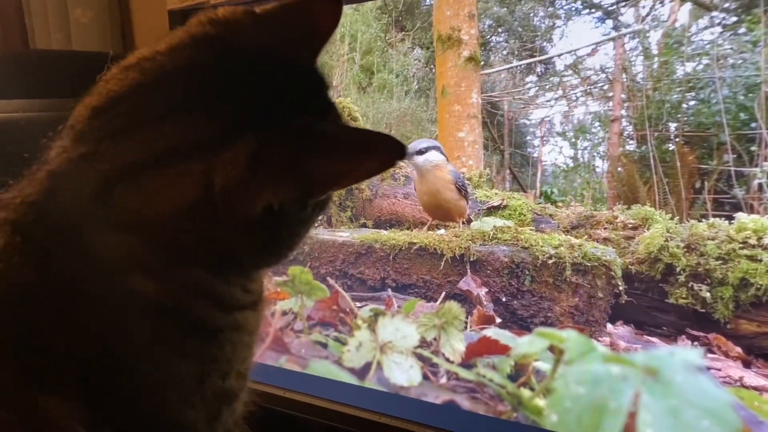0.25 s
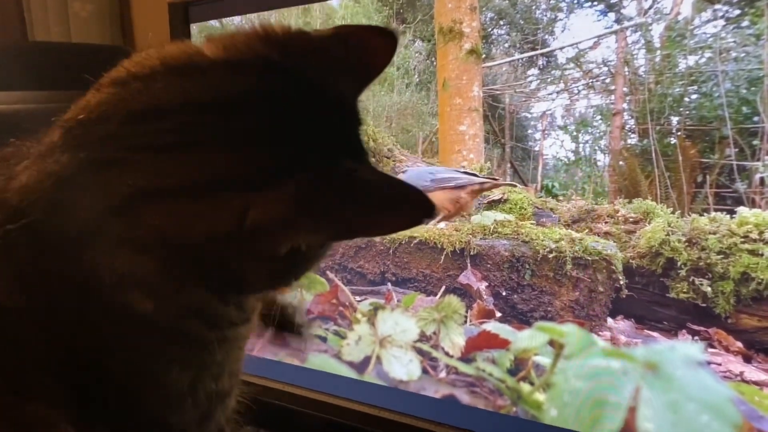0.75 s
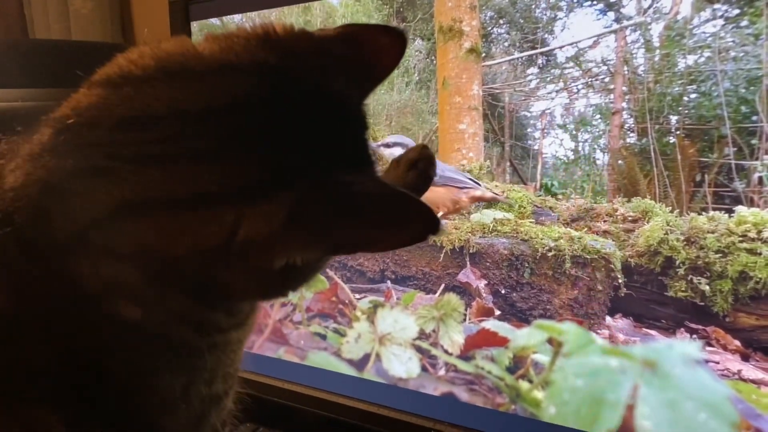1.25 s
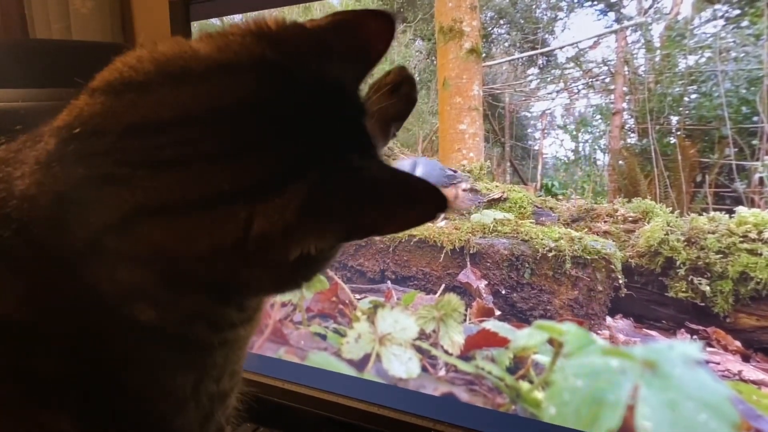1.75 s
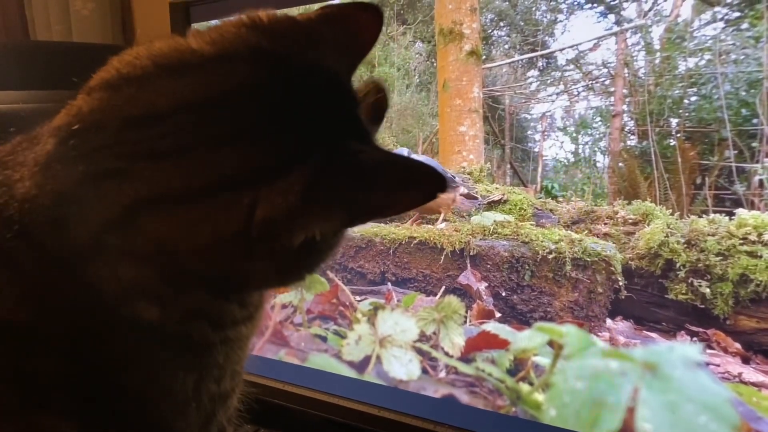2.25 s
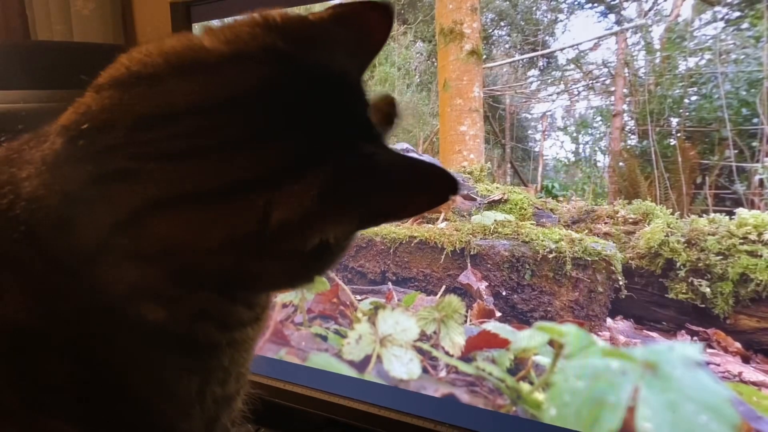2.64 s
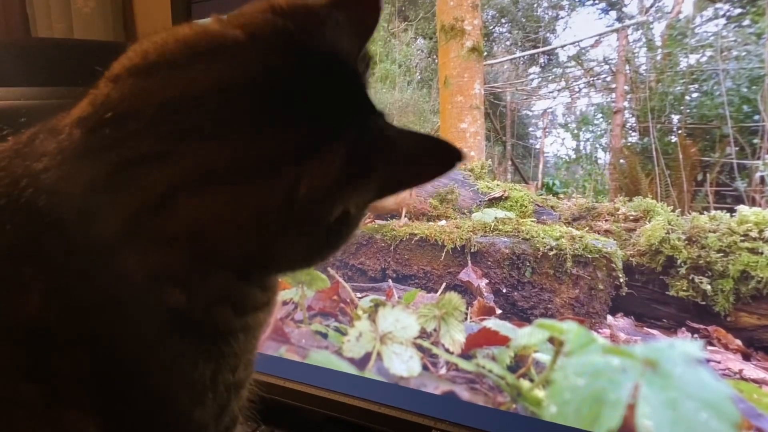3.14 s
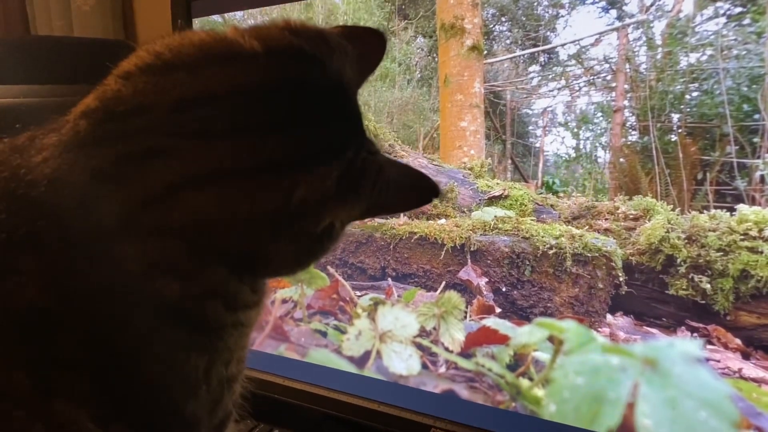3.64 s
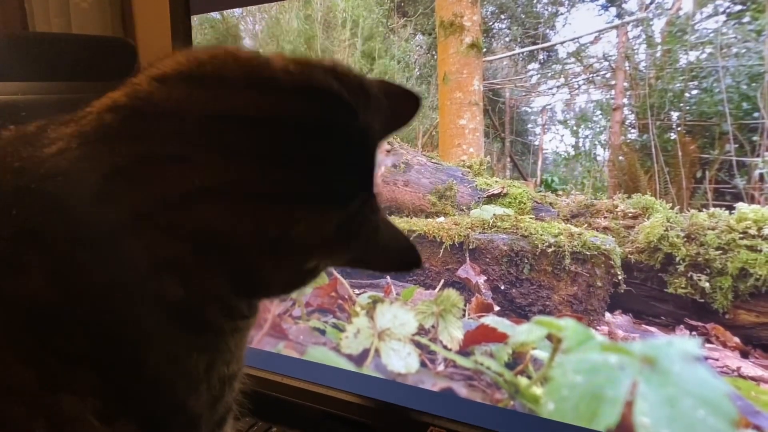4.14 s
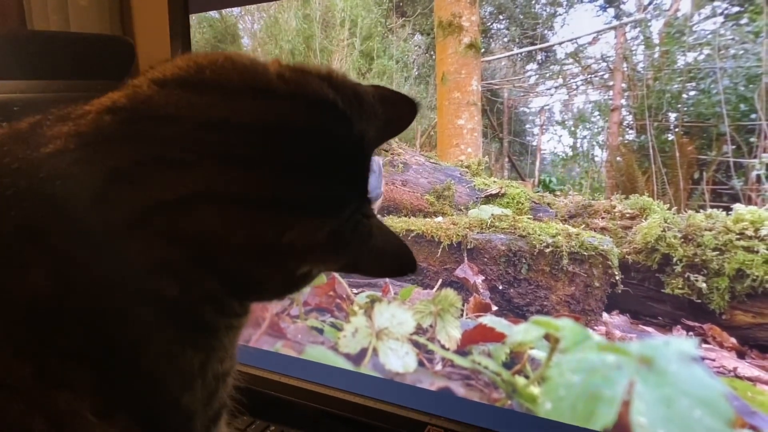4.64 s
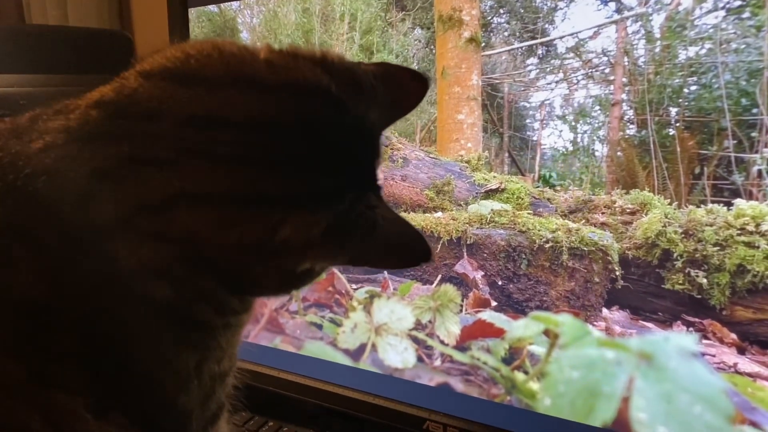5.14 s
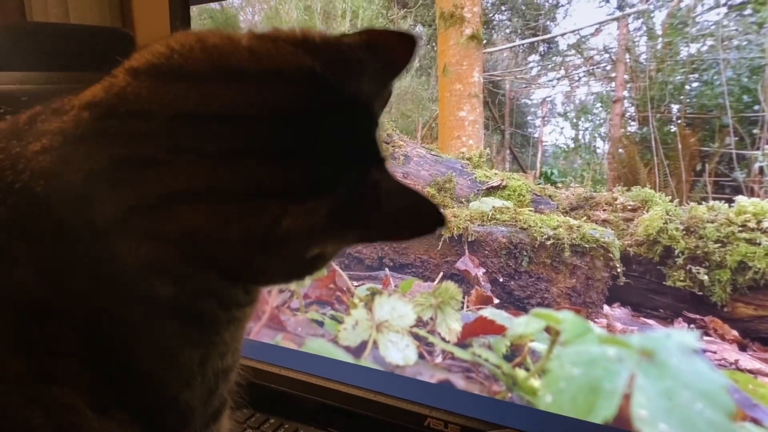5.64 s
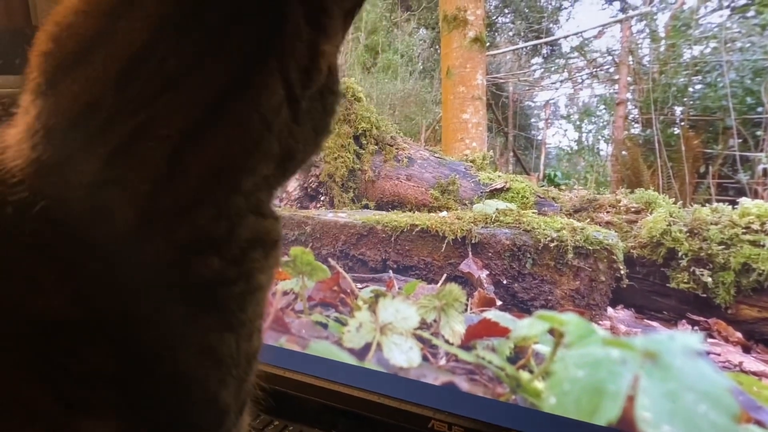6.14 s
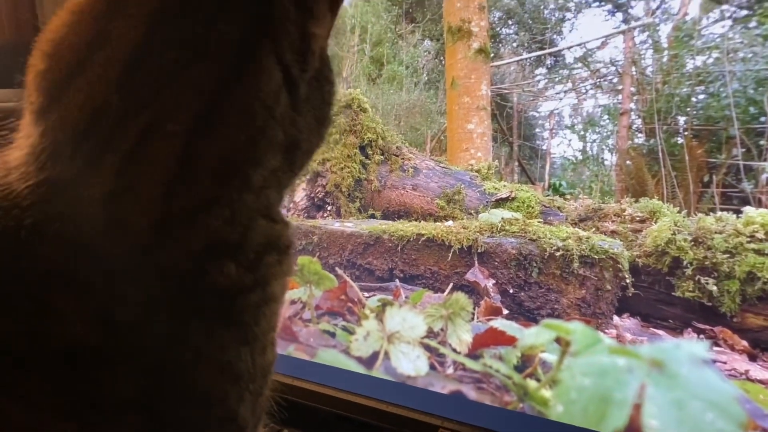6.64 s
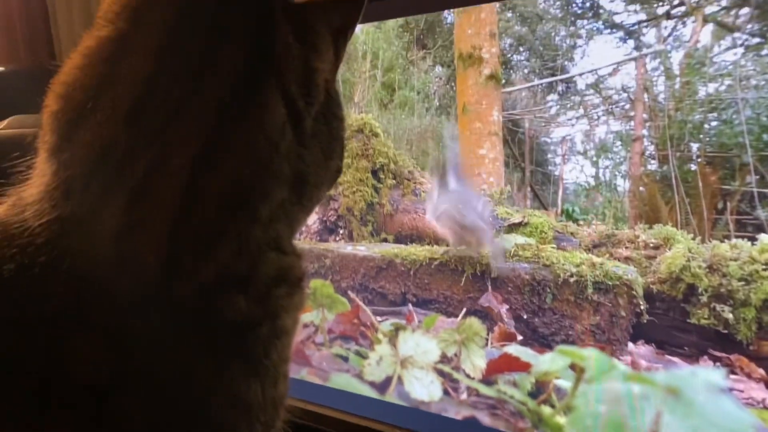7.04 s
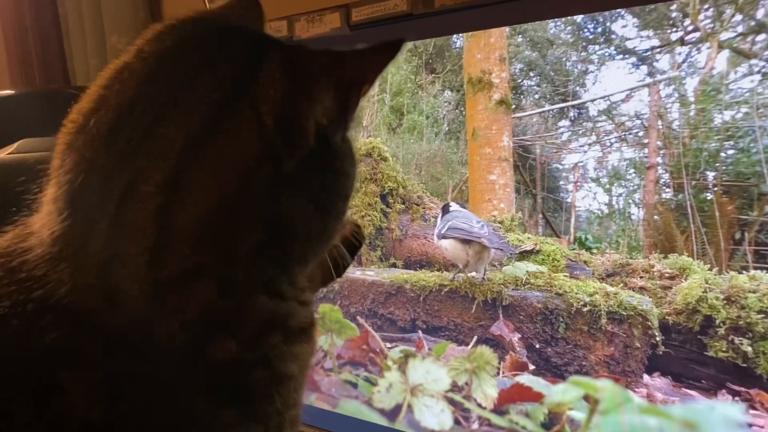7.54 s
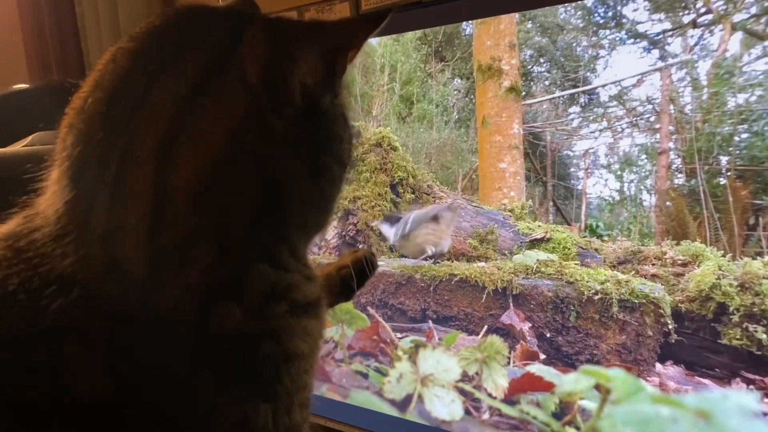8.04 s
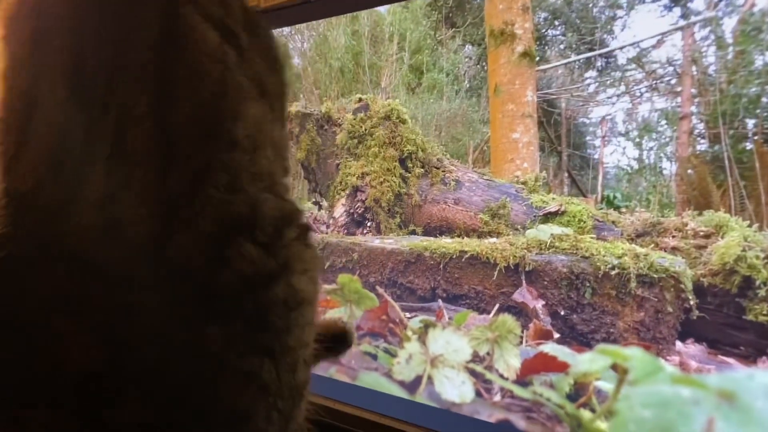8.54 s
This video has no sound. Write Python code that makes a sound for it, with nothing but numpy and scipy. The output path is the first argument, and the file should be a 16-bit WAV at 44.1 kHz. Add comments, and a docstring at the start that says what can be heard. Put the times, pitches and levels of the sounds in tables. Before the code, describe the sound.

A cat's paw taps and scuffs a screen over a low hum, then boomy bird wing flutters burst from its loudspeaker with thin chirps.

```python
"""A cat watches garden birds on a screen in a small room and paws at them.
Hum, drone and hiss run throughout as tones and filtered noise, over a faint rustle of noise scrapes.
From about 0.9 s come taps (blows that ring damped modes), dull scuffs (band noise) and seed ticks (bursts).
From 4.3 s the loudspeaker gives a few thin, high calls (gliding sines); from 5.4 s birds flutter off and
land, in even trains of boomy thumps with feathery swishes; from 7 s soft bumps sway the stand."""
import sys
import numpy as np
from scipy import signal
from scipy.fft import rfft, irfft
from scipy.io import wavfile
from scipy.ndimage import uniform_filter1d

SR = 44100
rng = np.random.default_rng(int(sys.argv[2]) if len(sys.argv) > 2 else 0)


def master_out(mix):
    """Clip the mix to full scale and print it as 16-bit PCM to the path in sys.argv[1]."""
    frames = np.transpose(np.atleast_2d(mix))
    ceiling = np.clip(frames, -1, 1)
    pcm = np.round(ceiling * 32767).astype(np.int16)
    wavfile.write(sys.argv[1], SR, pcm)


N = 387286
T = np.arange(N) / SR
FREQS = np.fft.rfftfreq(N, 1 / SR)


def undb(db):
    """Logarithmic level: decibels to amplitude gain."""
    return 10 ** (np.asarray(db) / 20)


def unit(x):
    """Effective value: scale to rms 1."""
    return x / np.sqrt(np.mean(x ** 2))


def decay(t, t60):
    """Exponential damping: the amplitude falls 60 dB in t60 seconds."""
    return np.exp(-np.log(1000) * t / t60)


def sine(hz, t):
    """Simple harmonic motion from rest position."""
    return np.sin(2 * np.pi * hz * t)


def read(points, hz):
    """Interpolation of (Hz, value) points on a log-frequency axis."""
    f, v = np.transpose(points)
    return np.interp(np.log(hz + 1), np.log(f), v)


def colour(x, points):
    """Minimum-phase filtering: a causal response with the given spectrum, keeping the power of white noise."""
    gain = undb(read(points, FREQS))
    # folding the cepstrum onto positive times makes the response causal
    cepstrum = irfft(np.log(unit(gain)), N)
    cepstrum[1:N // 2] *= 2
    cepstrum[N // 2 + 1:] = 0
    response = irfft(np.exp(rfft(cepstrum)), N)
    return irfft(rfft(x, 2 * N) * rfft(response, 2 * N))[..., :N]


def add(track, s, sound):
    """Superposition: mix a sound in at time s."""
    i = max(int(s * SR), 0)
    track[i:i + len(sound)] += sound[:max(N - i, 0)]


def burst(rise_s, fall_s):
    """Impact noise: a grain that swells and dies away; its loudest moment has rms 1."""
    t = T[:SR // 8]
    shape = (1 - np.exp(-t / rise_s)) ** 2 * np.exp(-t / fall_s)
    shape /= shape.max()
    grain = shape * rng.standard_normal(len(t))
    return unit(grain) * np.sqrt(np.mean(shape ** 2))


def grains(spread_db, size=48):
    """Stick-slip friction: uneven strengths of tiny contacts, each lasting size samples."""
    strengths = undb(spread_db * rng.standard_normal(N // size + 1))
    return unit(np.repeat(strengths, size)[:N])


LEFT_LAG = 11  # samples


def ports(x, lag=LEFT_LAG):
    """Interaural delay: the left microphone hears the sound lag samples after the right one."""
    return np.array([np.roll(x, int(lag)), x])


# reverberation time: frequency_hz, t60_s
ROOM_T60 = [(150, 0.4), (500, 0.32), (1500, 0.23), (4000, 0.2), (8000, 0.2), (14000, 0.068)]


def room(x, wet_db, lag=LEFT_LAG, near_db=-5, near_s=0.00094, build_s=0.0028):
    """Reverberation: direct sound, quick scatter off screen and shelf, a diffuse tail duller as it dies."""
    t = T[:SR // 2]
    f = np.fft.rfftfreq(len(t), 1 / SR)
    mid, side = rfft(rng.standard_normal((2, len(t))))
    spread = np.minimum(f / 400, 1)  # the bass is alike on both sides
    noise = (mid + np.array([[1], [-1]]) * spread * side) / np.sqrt(1 + spread ** 2)
    # overlapping bands, each with its own reverberation time
    tail = 0
    for share, (_, t60) in zip(np.eye(len(ROOM_T60)), ROOM_T60):
        band = np.interp(f, [hz for hz, _ in ROOM_T60], share)
        tail = tail + irfft(noise * band, len(t)) * decay(t, t60)
    tail = unit(tail * (1 - np.exp(-t / build_s)))
    near = unit(irfft(noise, len(t)) * np.sqrt(t) * np.exp(-t / near_s))
    echoes = (undb(wet_db) * tail + undb(near_db) * near) / np.sqrt(len(t))
    return ports(x, lag) + signal.fftconvolve(echoes, x[None], axes=1)[:, :N]


# mains hum: pitch_hz, level_db
HUM = [(119.9, -46), (240, -72.5), (360, -80), (480, -79.5), (600, -80), (720, -86.5)]
# resonances in the drone and whirr of household machines: pitch_hz, width_hz, level_db
DRONE = [(60.5, 22, -62), (79, 20, -64), (115.8, 13, -64), (116.6, 22.6, -51), (169, 58, -62.5),
         (217.2, 32.4, -58.5), (261.8, 57, -65.5), (1371, 51, -75.5), (1591, 100, -71), (4060, 140, -82)]
# spectrum of the hiss: frequency_hz, relative_level_db (per Hz)
AIR = [(180, -36), (300, 0), (366, 4.5), (758, -15.5), (925, -10.5), (1400, -14), (1880, -26), (2050, -8),
       (3650, -16.5), (4100, -29), (4380, -16.5), (9540, -41), (12000, -47.5), (14000, -41.5),
       (15700, -56.5)]
AIR_DB = -63


def background(diffuse_db=-1):
    """Steady tones and resonance: mains hum, a drone wavering in the room's resonances and a soft hiss."""
    hum = sum(undb(db) * np.sqrt(2) * np.sin(2 * np.pi * (hz * T + rng.random())) for hz, db in HUM)
    drone = 0
    for hz, width, db in DRONE:
        resonance = 1 / (1 + ((FREQS - hz) / width * 2) ** 2) ** 1.14
        noise = irfft(rfft(rng.standard_normal((2, N))) * resonance, N)
        mid, side = (unit(v) for v in noise)
        drone = drone + undb(db) * (ports(mid) + min(hz / 900, 1) * np.array([side, -side]))
    hiss = ports(rng.standard_normal(N)) + undb(diffuse_db) * rng.standard_normal((2, N))
    return ports(hum) + drone + undb(AIR_DB) * unit(colour(hiss, AIR))


# brushes against fur, moss and leaves: loudest_s, length_s, relative_level_db, crisp_share (0-1)
BRUSHES = [(0.96, 0.075, -57, 0.55), (1.16, 0.056, -61, 0.1), (1.56, 0.28, -57.5, 0.3),
           (1.722, 0.7, -60, 0.16), (2.882, 0.57, -67, 0.9), (4.147, 0.3, -58.5, 0),
           (4.965, 0.09, -55.5, 0.2), (6.14, 0.74, -60.5, 0.73), (6.645, 0.34, -58, 1),
           (6.844, 0.24, -50.5, 0.6), (8.466, 0.043, -56.5, 1), (8.614, 0.37, -51.5, 0.46)]
BRUSH_RISE, BRUSH_FALL = 0.21, 0.23  # time to change by a factor e, as shares of the length
# faint, dull rustle between the brushes: time_s, relative_level_db
STIR = [(0, -65.5), (.8, -68), (5.4, -66.5), (5.8, -64.5), (6.4, -66.5), (7.05, -61), (7.9, -65.5),
        (8.78, -58.5)]
STIR_CRISP = 0.084  # its share of crisp treble
# spectra of rubbed fur and of leaves: frequency_hz, relative_level_db (per Hz)
FUR = [(400, -9), (750, 2), (1100, 6.5), (1700, 10), (2300, 3), (3200, 0), (4500, -12), (8000, -18),
       (16000, -45)]
LEAVES = [(800, -6), (2000, 4), (3000, 3.5), (4500, -1), (6000, -1), (8500, -12), (10500, -10.5),
          (12000, -35), (14000, -12.5), (16000, -44)]


def rustle():
    """Friction noise: dense scrapes from dull fur to crisp leaves swell and die away over a faint stir."""
    stir = undb(np.interp(T, *np.transpose(STIR))) ** 2
    strokes = [(stir, STIR_CRISP)]
    for s, length, db, crisp in BRUSHES:
        u = (T - s) / length
        distance = np.minimum(np.maximum(-u / BRUSH_RISE, u / BRUSH_FALL), 20)
        strokes.append((undb(db) ** 2 * np.exp(-2 * distance), crisp))
    # powers of unrelated noises add
    dull = sum(power * (1 - np.clip(crisp, 0, 1)) for power, crisp in strokes)
    bright = sum(power * np.clip(crisp, 0, 1) for power, crisp in strokes)
    fur = colour(grains(2.5) * rng.standard_normal(N), FUR)
    leaves = colour(grains(2.5) * rng.standard_normal(N), LEAVES)
    return room(np.sqrt(dull) * fur + np.sqrt(bright) * leaves, wet_db=2.0, lag=-7) / 2


# taps of paw or beak: start_s, level_db, ring_pitch_hz, ring_db, snap_db, touch_to_blow_s
# (ring and snap relative to level)
TAPS = [(0.883, -35, 2750, 1, -16, 0.0017), (1.488, -32, 2550, -1.5, -13, .0015),
        (2.018, -51.5, 1970, -13, -17, 0.0014), (2.307, -37, 1930, -9, -19, 0.00174),
        (2.3147, -38, 1260, 0.5, -16, 0.001), (2.8096, -35, 2550, -3, -19, 0.0019),
        (2.815, -44, 3460, -6, -15, 0.0015), (3.438, -53, 2220, -15, -16, 0.0018),
        (4.1037, -44, 1170, 10, -19, 0.00047), (5.46, -35.5, 2150, -6, -8, 0.00152),
        (7.45, -55, 810, -2, -31, 0.0027), (8.033, -49, 1480, -10, -19, 0.0016),
        (8.722, -42.5, 2740, 14.5, -2, 0.0015), (8.755, -56, 2830, 24.5, -19, 0.0011)]
# modes of the screen's panel: pitch_hz, relative_level_db, t60_s
PANEL = [(1010, -17, 0.011), (1180, -11, .013), (1540, -7, 0.018), (2060, -6.5, 0.025), (2570, -7.5, 0.021),
         (2850, -6.5, 0.014), (3380, -1, .016), (3960, -7, 0.022)]
# spectra of the dry knock and the bright snap: frequency_hz, relative_level_db (per Hz)
KNOCK = [(300, -9), (550, -4), (750, -6.5), (1000, 0), (1250, 2), (1550, 1), (2100, 1.5), (3300, -2.5),
         (4300, -8), (6000, -35), (15000, -67)]
SNAP = [(2000, -74), (4200, 10.5), (6500, 18.5), (8500, 18.5), (10500, 8.5), (12000, -3), (14000, 7),
        (16000, 7.5)]
RING_CYCLES = 3.3  # a tap's ring falls to 1 / e in this many cycles


def taps(knock_db=12, rattle_db=-16, scatter_db=-23, touch=0.71, panel_db=-9, spot_db=-3.5):
    """Impulse excitation: touch and blow give a snap, knock, rattle and echoes, and ring damped modes."""
    knock, snap, ring = np.zeros((3, N))
    t = T[:SR // 8]
    for s, db, hz, ring_db, snap_db, blow_s in TAPS:
        push = undb([db + knock_db])  # a single-sample impulse
        add(knock, s, touch * push)
        add(knock, s + blow_s, push)
        add(knock, s, undb(db + rattle_db) * burst(0.0012, 0.019))
        # each spot sends its own scatter of echoes round the room
        add(knock, s, undb(db + scatter_db) * burst(0.01, 0.031))
        add(snap, s, undb(db + snap_db) * burst(0.000067, 0.0022))
        envelope = np.exp(-t * hz / RING_CYCLES) * (1 - np.exp(-t / 0.00096)) * 2
        add(ring, s, undb(db + ring_db) * sine(hz, t) * envelope)
        # each spot on the panel favours other modes
        for (mode_hz, mode_db, t60), luck in zip(PANEL, rng.standard_normal(len(PANEL))):
            gain = undb(db + panel_db + mode_db + spot_db * luck)
            add(ring, s + blow_s, gain * sine(mode_hz, t) * decay(t, t60))
    strike = colour(knock, KNOCK) + colour(snap, SNAP)
    blow = room(strike, wet_db=-12, lag=-2, near_db=-2, build_s=.012)
    return blow + room(ring, wet_db=-13, lag=-1, near_db=-10, build_s=.012)


# scuffs of the paw on the screen: start_s, rise_s, fade_s, relative_level_db, centre_pitch_hz, width_octaves
SCUFFS = [(0.959, 0.0089, 0.022, -63, 3950, 0.15), (1.17, 0.031, 0.032, -61, 2400, 1.5),
          (1.512, 0.008, 0.03, -50, 2100, 2.2), (1.71, 0.058, 0.058, -54.5, 2500, 2.0),
          (1.815, .01, 0.014, -56, 2500, 1.2), (2.325, 0.011, 0.04, -53, 1600, 1.6),
          (4.14, 0.057, 0.077, -59.5, 1800, 1.4), (4.955, 0.011, 0.022, -53.5, 2200, 1.4),
          (4.99, .015, 0.041, -52, 1500, 1.1), (6.48, 0.08, 0.13, -52, 1850, 1.6),
          (6.61, 0.028, 0.025, -58, 2500, 1.6), (7.29, .02, 0.03, -53, 640, 0.35),
          (7.449, 0.005, 0.025, -60.5, 794, .6), (7.86, .025, 0.046, -60.5, 610, 0.6),
          (8.025, 0.004, 0.023, -54, 650, 1.5), (8.14, .004, 0.14, -63, 600, 0.6),
          (8.755, 0.0043, .03, -56, 740, 0.56)]


def scuffs(grain_db=2.5):
    """Sliding friction: a dragged pad makes band noise, hollow when low, nearly a squeak if high and narrow."""
    out, t = np.zeros(N), T[:SR // 2]
    for s, rise_s, fade_s, db, hz, octaves in SCUFFS:
        edges = hz * 2 ** (octaves * np.array([-.5, .5]))
        band = signal.butter(2, edges, "bandpass", fs=SR, output="sos")
        slips = grains(grain_db)[:len(t)] * rng.standard_normal(len(t))
        envelope = (1 - np.exp(-t / rise_s)) * np.exp(-t / fade_s)
        add(out, s, undb(db) * unit(signal.sosfilt(band, slips)) * envelope)
    return room(out, wet_db=-17.5, near_db=5.5)


# tiny ticks of seed and claw: start_s, level_db
TICKS = [(0.963, -65), (1.747, -57), (1.8, -47.5), (1.854, -44), (1.909, -49), (1.964, -43.5), (3.703, -56),
         (3.827, -51.5), (3.926, -49.5), (4.034, -49.5), (7.229, -57)]
# spectrum of a tick: frequency_hz, relative_level_db (per Hz)
TICK = [(800, -29), (2500, 0), (3700, -3), (4900, 5), (6700, -5), (8000, -9.5), (10500, -20), (12000, -55),
        (14000, -42), (16000, 4)]


def ticks():
    """Short impacts have broad spectra: very short, bright clicks from a little to the left."""
    out = np.zeros(N)
    for s, db in TICKS:
        add(out, s, undb(db) * burst(0.00018, 0.0032))
    return room(colour(out, TICK), wet_db=-8.0, lag=-21, near_db=-5)


# bird calls: start_s, level_db, start_pitch_hz, turn_pitch_hz, end_pitch_hz, length_s
BIRD_CALLS = [(4.296, -72.5, 4060, 4050, 4000, 0.23), (5.686, -46.5, 6300, 7900, 7900, 0.021),
              (5.874, -51.5, 7400, 7910, 7760, 0.016), (6.048, -62, 5760, 7780, 7200, 0.03),
              (6.458, -65.5, 7090, 7800, 7300, 0.032), (8.19, -72, 5000, 4700, 4550, .065),
              (8.33, -65, 4120, 4030, 3990, 0.18), (8.5786, -37, 6450, 7530, 7400, 0.011)]


def calls(waver=0.0055, flutter_db=4, turn=0.64, taper=0.37):
    """Frequency modulation: thin, wavering, grainy whistles glide to a turning pitch, level off and bend on."""
    out = np.zeros(N)
    flutter = uniform_filter1d(grains(flutter_db, size=160), size=80)
    for s, db, start_hz, turn_hz, end_hz, length in BIRD_CALLS:
        u = np.linspace(0, 1, int(length * SR))
        quiver = unit(uniform_filter1d(rng.standard_normal(SR // 2), size=90))[:len(u)]
        # two parabolas that meet level at the turn
        bend = np.where(u < turn, (start_hz - turn_hz) / turn ** 2, (end_hz - turn_hz) / (1 - turn) ** 2)
        hz = (turn_hz + bend * (u - turn) ** 2) * (1 + waver * quiver)
        arch = np.abs(np.sin(np.pi * u)) ** taper
        loudness = undb(db) * arch * unit(flutter[int(s * SR):][:len(u)])
        add(out, s, loudness * np.sin(2 * np.pi * np.cumsum(hz) / SR))
    return room(out, wet_db=-6, lag=0, near_db=-12)


# flights, each an even train of wingbeats that swells as the bird nears and fades as it leaves:
# first_stroke_s (before the lateness below), last_stroke_s, strokes (count),
# swish_db, swish_loudest_s, swish_fade_db_per_s,
# thump_db, deep_gust_db, thump_loudest_s, thump_fade_db_per_s, swell_db_per_s (levels relative)
FLIGHTS = [(5.439, 5.7047, 7, -37, 5.56, 99, -17.5, -21, 5.54, 44.5, 28.5),
           (5.7197, 5.882, 5, -55.5, 5.72, 23, -29, -42, 5.76, 87, 27),
           (6.747, 6.917, 6, -40, 6.855, 140, -20.5, -34, 6.885, 59, 115),
           (7.998, 8.31, 10, -49.5, 8.07, 46, -25.5, -37, 8.06, 35, 11),
           (8.549, 8.696, 5, -58, 8.59, 33, -31.5, -30, 8.59, 12, 52)]
# chance in time and strength from one stroke to the next (standard deviations)
BEAT_JITTER_S, BEAT_SCATTER_DB = .0003, 1.2
FIRST_SWISH_DB, FIRST_THUMP_DB = -5, -7  # the opening half stroke moves little air
FIRST_LATE_S = 0.0046  # the opening half stroke is short, so it comes this much closer to the next


def wingbeats(gust_fade=1.3):
    """Periodic excitation: strokes as (s, swish dB, thump dB, gust dB); the gust fades sooner than the thump."""
    for (first, last, strokes, swish_db, swish_s, swish_fade,
         thump_db, gust_db, thump_s, thump_fade, swell) in FLIGHTS:
        s = np.linspace(first, last, round(strokes))
        opening = s == first
        late, swish_luck, air_luck = rng.standard_normal((len(s), 3)).T

        def arch(loudest, fade):
            """Approach and retreat: the level in dB rises, then falls, in straight lines."""
            return np.minimum(swell * (s - loudest), fade * (loudest - s))

        swish = swish_db + arch(swish_s, swish_fade) + FIRST_SWISH_DB * opening + BEAT_SCATTER_DB * swish_luck
        air = FIRST_THUMP_DB * opening + BEAT_SCATTER_DB * air_luck
        thump = thump_db + air + arch(thump_s, thump_fade)
        gust = gust_db + air + arch(thump_s, gust_fade * thump_fade)
        yield from zip(s + FIRST_LATE_S * opening + BEAT_JITTER_S * late, swish, thump, gust)


# spectra of the brushing and of the flicking feathers: frequency_hz, relative_level_db (per Hz)
SWISH = [(400, -1.5), (750, 7.5), (1200, 18.5), (2000, 21), (3000, 16.5), (4000, 3.5), (4900, 17.5),
         (5400, 14.5), (6200, 15.5), (7600, -2.5), (8800, -5), (10900, -9.5), (12200, -58), (13400, -13),
         (14700, -16), (15600, 1)]
FLICK = [(800, -16), (2000, -2), (3000, 1), (3500, 6.5), (4200, 8.5), (4900, 8), (5600, 1), (6400, 1.5),
         (7600, 0), (8800, -10), (10900, -5), (12200, -30), (13500, -8), (15600, -14)]
FEATHER_LEAD_S, FLICK_SPAN_S = .004, .02  # head start on the thump, duration of the run of flicks
FLICK_FADE_DB = 3  # flicks soften by up to this much through the run


def feathers(grain_db=4, brush_db=-2, flick_db=-5, upstroke_db=-15, upstroke_s=.024, count=10):
    """Turbulence and contact: downstrokes flick feathers raggedly over a brush; upstrokes brush faintly."""
    brush, flicks = np.zeros((2, N))
    for s, db, _, _ in wingbeats():
        start = s - FEATHER_LEAD_S
        add(brush, start, undb(db + brush_db) * burst(0.0009, 0.0095))
        add(brush, start + upstroke_s, undb(db + upstroke_db) * burst(0.0016, 0.011))
        for late in (np.arange(count) + rng.random(count)) / count:
            gain = undb(db + flick_db - FLICK_FADE_DB * late)
            add(flicks, start + late * FLICK_SPAN_S, gain * burst(.0002, 0.0009))
    sound = colour(brush * grains(grain_db, size=24), SWISH) + colour(flicks * grains(grain_db), FLICK)
    return room(sound, wet_db=-6.5, near_db=-5, build_s=.02)


# boom of loudspeaker and room: pitch_hz, relative_level_db, t60_s
BOOM = [(48.8, -18, .2), (70, -5, .26), (113, -2, .27), (122, -5.5, .33), (155.7, -3, .1), (183, -14, .25),
        (204, -15, .3), (226, -8.5, .38), (247, -13, .27), (288.7, -11, .08), (328, -12, .15),
        (402, -10, .05)]
# spectrum of the eddies behind a wing: frequency_hz, relative_level_db (per Hz)
EDDIES = [(28, -23), (48, -1), (68, 6), (88, -6.5), (110, 7), (150, -1), (240, 8), (300, -5), (400, -1.5),
          (560, -17), (1200, -43), (4000, -63.5)]
BOOM_DB, WHIRL_DB = -3, -15
GUST_HZ, GUST_S = 60, 0.0023  # the deep push of air under each stroke
THUMP_LEFT_DB = 2.4  # the thumps are this much stronger on the left


def thumps():
    """Forced resonance: every downstroke shoves the air, which rings the low resonances."""
    whirl, shove, gust = np.zeros((3, N))
    t = T[:SR // 2]
    puff = sine(GUST_HZ, t) * t / GUST_S * np.exp(-t / GUST_S)
    for s, _, air_db, gust_db in wingbeats():
        add(whirl, s, undb(air_db + WHIRL_DB) * burst(0.0012, 0.02))
        add(shove, s, undb([air_db]))
        add(gust, s, undb(gust_db) * puff)
    body = sum(undb(db) * sine(hz, t) * decay(t, t60) for hz, db, t60 in BOOM)
    swell = (1 - np.exp(-t / .004)) ** 2
    thump = signal.fftconvolve(shove, body * swell)[:N]
    # eddies behind the wing make each stroke a little different
    eddies = room(colour(whirl, EDDIES), wet_db=-3.0, near_db=0.5)
    balance = undb(THUMP_LEFT_DB * np.array([[.5], [-.5]]))
    return (ports(undb(BOOM_DB) * thump + gust) + eddies) * balance


# soft bumps of the cat against the screen and its stand: start_s, relative_level_db
BUMPS = [(7.063, -33), (7.139, -30.5), (7.25, -38.5), (8.697, -35)]


def bumps(stand_hz=108, sway_hz=67, sway_db=-13):
    """Modal vibration: a padded push sets the stand swaying in its two lowest modes."""
    out, t = np.zeros(N), T[:SR // 4]
    swell = t / .022  # the push peaks after 22 ms
    swing = sine(stand_hz, t) + undb(sway_db) * sine(sway_hz, t)
    for s, db in BUMPS:
        add(out, s, undb(db) * swing * (swell * np.exp(1 - swell)) ** 2)
    return ports(out)


def scene():
    """Superposition: the pressures of all sources add at the two microphones."""
    steady = background() + rustle()
    paw = taps() + scuffs() + ticks() + bumps()
    birds = calls() + feathers() + thumps()
    return steady + paw + birds


# left minus right: frequency_hz, level_difference_db
TILT = [(60, -4), (110, -4.5), (200, -4.5), (380, -4.5), (700, -4.5), (1290, -4), (2380, 1), (4800, 4.5),
        (8100, -1.5), (15000, 0.5)]
TOP_HZ = 15100


def record(dry):
    """Frequency response: the two microphones differ in colour; deep bass and the top are cut."""
    tilt_db = np.array([[.5], [-.5]]) * read(TILT, FREQS)
    bass_cut = 1 / np.sqrt(1 + (38 / (FREQS + 1)) ** 16)
    heard = irfft(rfft(dry) * undb(tilt_db) * bass_cut, N)
    return signal.sosfilt(signal.ellip(8, .2, 70, TOP_HZ, fs=SR, output="sos"), heard)


dry = scene()
out = record(dry)
master_out(out)
```